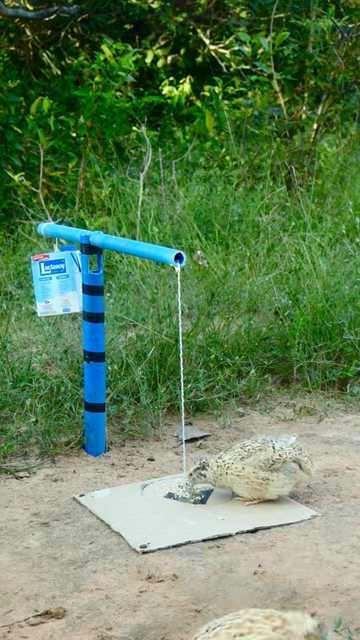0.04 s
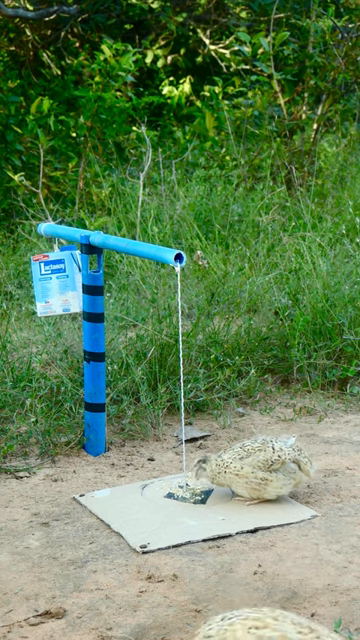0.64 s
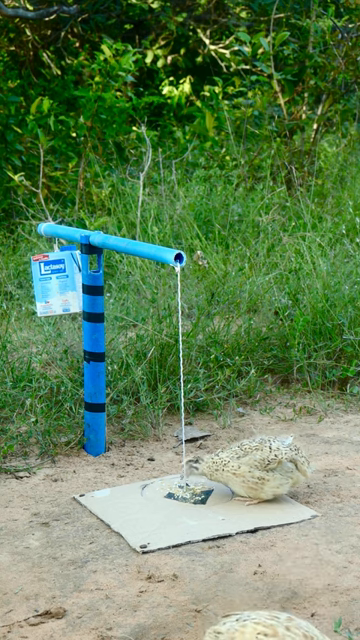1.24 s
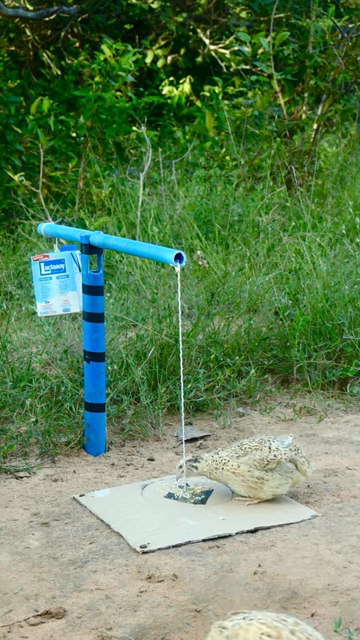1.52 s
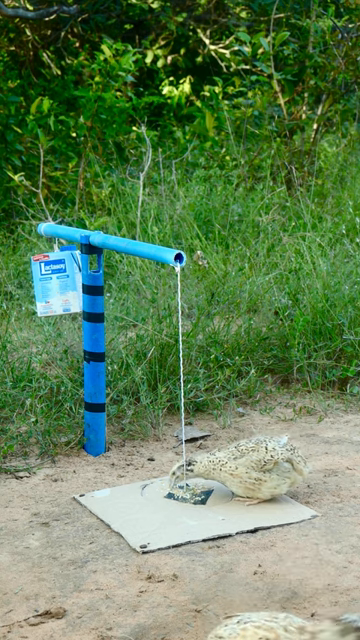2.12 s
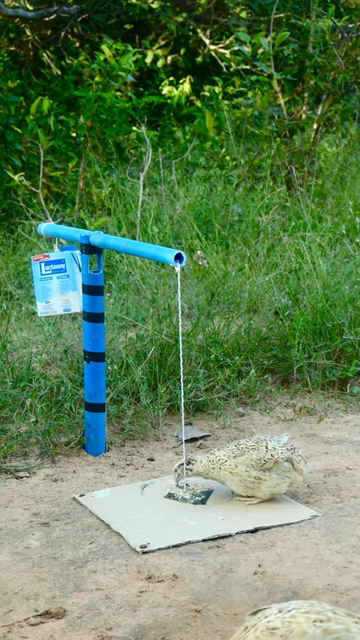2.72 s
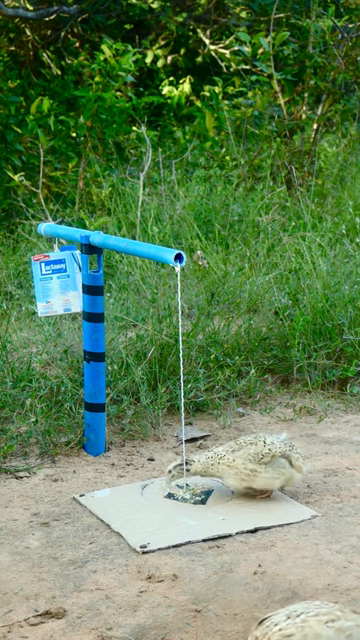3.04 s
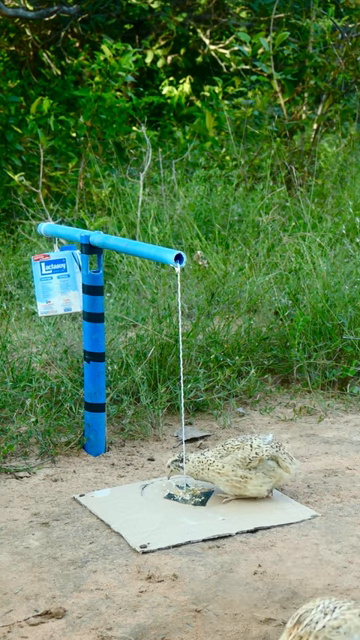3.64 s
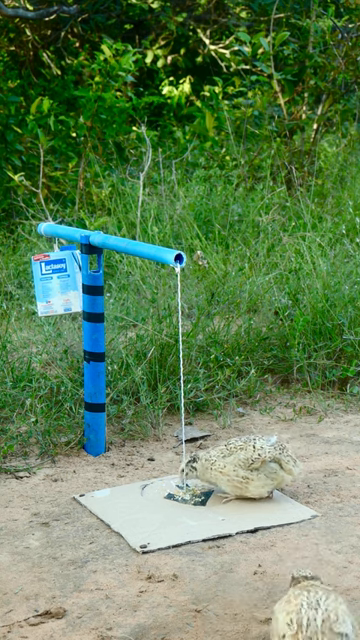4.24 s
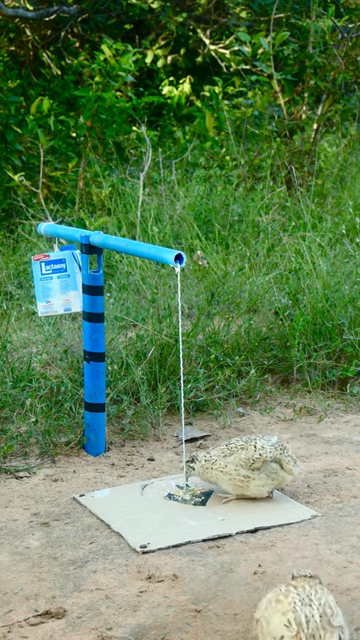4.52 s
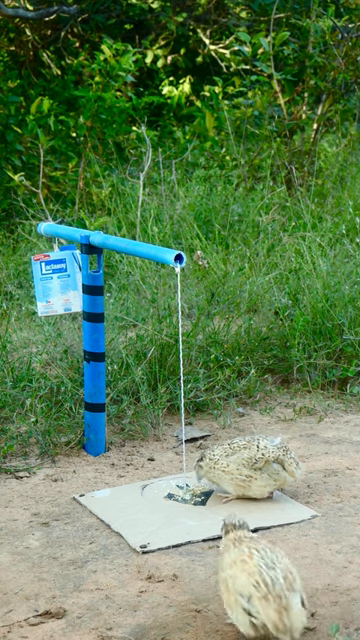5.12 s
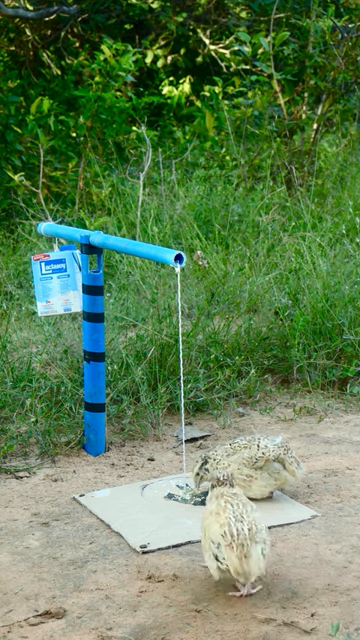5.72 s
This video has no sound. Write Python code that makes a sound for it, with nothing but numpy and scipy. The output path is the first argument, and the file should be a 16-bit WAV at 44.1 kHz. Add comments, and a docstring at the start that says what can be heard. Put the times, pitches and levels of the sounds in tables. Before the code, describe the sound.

A quail pecks seed off cardboard with dull taps and rustles, broken by one sharp snap, over faint insects and a distant engine.

```python
"""Open sandy ground, stereo microphones: air, a far engine's hum and high insects run throughout. From the
start a quail just ahead pecks seed off a sheet of cardboard, each peck a few beak contacts and a dull, falling
thump of the sheet. Its feet shuffle as it feeds; seed and sand rustle. Near 1 s the beak skids over a husk,
from 2.5 s come a few thin peeps, and at 4.3 s one sharp snap echoes off the bushes while the pecking goes on."""
import sys
import numpy as np
from scipy import signal
from scipy.fft import rfft, irfft
from scipy.io import wavfile

SR = 44100
rng = np.random.default_rng(int(sys.argv[2]) if len(sys.argv) > 2 else 0)


def generate_wav(signal):
    """Clip the signal to [-1, 1] and save it as 16-bit WAV at the path in sys.argv[1]."""
    frames = np.transpose(np.atleast_2d(signal))
    scaled = np.clip(frames, -1, 1) * 32767
    pcm = np.round(scaled).astype(np.int16)
    wavfile.write(sys.argv[1], SR, pcm)


N = 262836
TIME = np.arange(N) / SR
FREQS = np.fft.rfftfreq(N, 1 / SR)

# Pecks on the sheet, knock and tick before their trims, rebound against the first touch:
# start_s, thump_db, settled_pitch_hz, swell_s, ring_db, knock_db, tick_db, rebound_gap_s, rebound_db
PECKS = [(0.065, -32, 138.4, 0.017, -36, -53, -55.5, .007, -2),
         (0.253, -32, 138, 0.015, -37, -43.5, -62, .006, -2.5),
         (0.454, -32.5, 134, 0.0078, -42, -48.5, -55.5, .0075, 4),
         (0.665, -29.5, 135, 0.011, -41.5, -49, -47.5, 0.0045, 0),
         (0.902, -38.5, 140, 0.0058, -43.5, -46.5, -56, .004, 3.5),
         (1.147, -41, 148, 0.0066, -41.5, -43, -49, 0.0081, 1.5),
         (1.333, -35, 138, 0.012, -49, -44, -49, 0.0087, -3),
         (1.724, -33, 138, 0.01, -41, -37, -62, 0.011, -6),
         (1.960, -28.5, 134, 0.012, -43, -42, -49.5, 0.0063, -0.5),
         (2.186, -29.5, 130, 0.012, -53, -45.5, -51.5, .008, -0.5),
         (2.348, -30.5, 122.5, 0.0075, -44, -42.5, -48, 0.0063, -9),
         (2.581, -31.5, 132, 0.0089, -39.5, -41.5, -46, .005, -8.5),
         (2.763, -26.5, 128, 0.0098, -36, -44, -48.5, 0.0064, -1),
         (3.077, -28, 138.6, 0.01, -33, -43.5, -56, 0.0062, 4.5),
         (3.143, -35.5, 140.4, 0.013, -35.5, -65, -49.5, 0.0031, -2.5),
         (3.315, -30, 130, 0.01, -36, -47.5, -51.5, 0.0044, -3),
         (3.503, -41.5, 140.5, 0.011, -40.5, -47.5, -47.5, 0.007, -1),
         (3.879, -28.5, 126, 0.011, -45, -50, -54, 0.0055, 2.5),
         (4.099, -30.5, 124.6, .0135, -28.5, -46.5, -49.5, .014, -2),
         (4.444, -25, 129, 0.0087, -40, -42.5, -45.5, 0.0038, -6.5),
         (4.672, -36.5, 133, 0.0078, -40.5, -41, -51, .008, -8),
         (4.884, -33.5, 126.4, 0.0086, -39, -41, -47.5, .006, -3),
         (4.955, -35.5, 118, 0.0048, -44.5, -54, -56, .005, -6),
         (5.113, -34, 121, 0.0093, -36.5, -48.5, -54.5, 0.0089, -2.5),
         (5.528, -38.5, 124, .013, -39, -45.5, -46, .006, -14),
         (5.697, -39.5, 120, 0.011, -39.5, -52, -57, .006, -16),
         (5.773, -34.5, 123, 0.013, -42, -48.5, -53.5, .007, 1),
         (5.926, -34.5, 142, .011, -37, -49, -49, .005, -18)]
# Colour of a beak on dry seed: frequency_hz, relative_db
TICK_COLOUR = [(600, -17), (2000, -9), (3000, 1.5), (4200, -2.5), (5400, 5), (6600, 7.5), (8400, -1.5),
               (10000, 1.5), (12500, -4.5), (15500, -23)]


def amp(db):
    """Decibels to gain."""
    return 10 ** (np.asarray(db) / 20)


def unit(x):
    """Scales to rms 1."""
    return x / np.sqrt(np.mean(x ** 2) + 1e-20)


def read(points, hz):
    """Reads a spectrum on a log-frequency axis."""
    f, value = np.transpose(points)
    return np.interp(np.log(hz + 1), np.log(f + 1), value)


def add(mix, start_s, sound):
    """Lays a sound into the mix."""
    part = mix[max(round(start_s * SR), 0):][:len(sound)]
    part += sound[:len(part)]


def impulse(points, size=1024):
    """The shortest causal click that has a given spectrum, with energy 1."""
    log_gain = np.log(amp(read(points, abs(np.fft.fftfreq(size, 1 / SR)))))
    minimum_phase = np.exp(np.conj(signal.hilbert(log_gain)))
    click = np.fft.ifft(minimum_phase).real[:size // 2]
    return click / np.linalg.norm(click)


def colour(x, points):
    """Passes sound through a causal filter of the given spectrum."""
    return signal.oaconvolve(x, impulse(points))[:len(x)]


def wander(rate_hz):
    """Random drift of rms 1, mostly slower than rate_hz."""
    spectrum = rfft(rng.standard_normal(N)) / (1 + (FREQS / rate_hz) ** 4)
    return unit(irfft(spectrum * (FREQS > 0), N))


def stereo_noise(gain):
    """Noise of a given spectrum, partly alike at the two microphones."""
    # Likeness of left and right: frequency_hz, correlation
    likeness = [(25, 0.5), (70, 0.7), (130, 0.66), (260, 0.01), (1200, 0.3), (3000, 0.28), (7700, 0.92),
                (10000, 0.5), (14000, 0.2)]
    mid, side = rfft(rng.standard_normal((2, N)))
    same = read(likeness, FREQS)
    side *= np.sqrt((1 - same) / (1 + same))
    return irfft(np.array([mid + side, mid - side]) * gain, N) / np.std(irfft(mid * gain, N))


def band(hz, width_hz, db):
    """A narrow hump of stereo noise."""
    return amp(db) * stereo_noise(1 / (1 + ((FREQS - hz) / width_hz) ** 2))


def open_air(level_db=-57.5):
    """The low, steady rush of open air around the microphones."""
    # Colour of the air: frequency_hz, relative_db
    air_colour = [(20, -19), (35, -28), (55, -12.5), (75, -2), (120, 0.5), (190, -5), (270, -7.5),
                  (450, -18), (1400, -16.5), (2000, -23), (4200, -31), (5600, -24.5), (10000, -27.5),
                  (15500, -38)]
    return amp(level_db) * stereo_noise(amp(read(air_colour, FREQS)))


def far_engine(firing_hz=93.7, waver=0.015, flutter_db=2.0):
    """A distant engine's firing note, wavering on its way through the air, under steady noise bands."""
    # Upper bands of the engine: centre_hz, half_width_hz, level_db
    upper_bands = [(590.4, 24, -71), (870, 68, -77), (1128, 5, -77.5), (1284, 55, -70.5)]
    # Swell and fade of the firing note: time_s, level_db
    swells = [(0, -59), (.35, -55.5), (1.15, -55), (1.55, -58.5), (2.4, -62.5), (2.95, -58), (3.7, -61.5),
              (4.4, -57.5), (4.85, -57), (5.3, -61.5), (5.95, -57)]
    whirr = sum(band(*row) for row in upper_bands)
    turns = np.cumsum(firing_hz * (1 + waver * wander(rate_hz=8.8))) / SR
    level_db = np.interp(TIME, *np.transpose(swells)) + flutter_db * wander(rate_hz=4.5)
    return whirr + amp(level_db) * unit(np.sin(2 * np.pi * turns))


def insects(throb_db=0.55, chirps_per_s=7.42, first_chirp_s=.078, chirp_s=0.049):
    """A shimmering chorus, with one insect nearer the microphones chirping in steady time."""
    # Bands of the chorus: centre_hz, half_width_hz, level_db
    chorus_bands = [(7500, 560, -67.5), (7820, 180, -68.5)]
    chorus = sum(band(*row) * amp(throb_db * wander(rate_hz=4.7)) for row in chorus_bands)
    beats = (TIME - first_chirp_s) * chirps_per_s
    from_crest_s = ((beats + .5) % 1 - .5) / chirps_per_s
    chirps = np.exp(-(2 * from_crest_s / chirp_s) ** 4) * amp(throb_db * wander(rate_hz=4.1))
    return chorus + chirps * band(hz=7790, width_hz=320, db=-65.5)


def touches(rebound_crisp_db=5.5, last_touch_db=-5.5, fade_db=-3):
    """The beak strikes, rebounds and touches again, amid stray taps. Gives start_s, knock_db, tick_db."""
    # Stray light taps between pecks, seed clicks and a couple of soft footfalls, before the trims:
    # start_s, knock_db, tick_db
    stray_taps = [(0.707, -61, -50), (0.769, -67, -56), (1.018, -59, -71), (1.028, -51, -63),
                  (1.758, -53, -57), (1.797, -51, -57), (2.006, -52, -55), (3.224, -59, -70),
                  (3.233, -66, -48.5), (3.269, -56, -53), (3.761, -51.5, -67), (4.509, -58, -60),
                  (4.801, -53.5, -58), (5.188, -58, -58), (5.207, -51.5, -58)]
    contacts = []
    for start_s, *_, knock_db, tick_db, gap_s, rebound_db in PECKS:
        last_gap_s = rng.uniform(.0036, .003696)
        last_db = min(rebound_db, 0) + last_touch_db
        crisp_db = rebound_db + rebound_crisp_db  # the rebound lands on seed
        contacts += [(start_s, knock_db, tick_db),
                     (start_s + gap_s, knock_db + rebound_db, tick_db + crisp_db),
                     (start_s + gap_s + last_gap_s, knock_db + last_db, tick_db + last_db)]
    for start_s, knock_db, tick_db in stray_taps:
        gap_s = rng.uniform(.001575, .00336)
        for k in range(3):  # each tap is three quick, fading contacts
            contacts.append((start_s + k * gap_s, knock_db + 2 * k * fade_db, tick_db + k * fade_db))
    return contacts


def sheet_blow(modes, spread, detune):
    """One blow on the sheet; the mix and tuning of its modes vary at random, as with where it lands."""
    t = TIME[:SR // 5]
    hz, db, t60 = np.transpose(modes)[:, :, None]
    weight, shift, lag = rng.standard_normal((3, len(modes), 1))
    waves = np.sin(2 * np.pi * hz * (1 + detune * shift) * t + np.pi * lag)
    return ((1 + spread * weight) * amp(db - 60 * t / t60) * waves).sum(0)


def sheet_thumps(start_pitch_ratio=2.3, settle_s=0.005):
    """Short bending waves outrun long ones, so each thump falls in pitch; the sheet then rings on."""
    # Low modes of the sheet: pitch_hz, relative_db, t60_s
    low_modes = [(141.5, 5.5, 0.13), (184.3, -4, 0.18), (253, 13, 0.059)]
    out, t = np.zeros(N), TIME[:SR // 5]
    glide = t + (start_pitch_ratio - 1) * settle_s * (1 - np.exp(-t / settle_s))
    for start_s, thump_db, hz, swell_s, ring_db, *_ in PECKS:
        swell = (t / swell_s * np.exp(1 - t / swell_s)) ** 2.36
        push = swell * np.sin(2 * np.pi * hz * glide)
        ring_onset = 1 - np.exp(-(t / swell_s / 2) ** 2)
        ring = ring_onset * sheet_blow(low_modes, spread=0.64, detune=0.057)
        add(out, start_s, amp(thump_db) * push + amp(ring_db) * ring)
    return out


def card_knocks(contacts, trim_db=-2):
    """Each contact rings the cardboard's upper modes."""
    # Upper modes of the sheet: pitch_hz, relative_db, t60_s
    upper_modes = [(585, -3, .038), (665, -7, .03), (830, -8, .025), (1010, -3, .032), (1125, -4, .03),
                   (1380, -5, .026), (1740, -2.5, .026), (2300, -8, .014), (2980, -8, .018)]
    out = np.zeros(N)
    for start_s, db, _ in contacts:
        knock = sheet_blow(upper_modes, spread=0.063, detune=0.016)
        attack_rms = np.std(knock[:SR // 600])
        add(out, start_s, amp(db + trim_db) * knock / attack_rms)
    return out


def ticks(contacts, trim_db=-1, crack_s=0.0015, crunch_db=-15, crunch_s=0.017):
    """Each contact, mostly hard beak on dry seed, gives an instant crack and a short gritty crunch."""
    out, t = np.zeros(N), TIME[:SR // 20]
    for start_s, _, db in contacts:
        crack, grit, size = rng.standard_normal((3, len(t)))
        crunch = amp(crunch_db) * grit * size * np.exp(-t / crunch_s)
        tick = crack * np.exp(-t / crack_s) + crunch
        attack_rms = np.std(tick[:SR // 600])
        add(out, start_s, amp(db + trim_db) * tick / attack_rms)
    return colour(out, TICK_COLOUR)


def grains(per_s, spread_db, clump_db):
    """Tiny collisions of uneven size that come in clumps."""
    size = amp(spread_db * np.minimum(rng.exponential(1, N), 4)) * rng.standard_normal(N)
    hits = rng.random(N) < per_s / SR
    return unit(size * hits * amp(clump_db * wander(rate_hz=66)))


def seed_ring(resonances):
    """The damped resonances of a seed or husk, with energy 1."""
    t = TIME[:SR // 50]
    ring = sum((-1) ** k * amp(db) * width * np.exp(-np.pi * width * t) * np.sin(2 * np.pi * hz * t)
               for k, (hz, width, db) in enumerate(resonances))
    return ring / np.linalg.norm(ring)


def scuffs(coarse_trim_db=-4, fine_trim_db=-2, seed_width_hz=550):
    """Feet and beak drag coarse seed and fine sand, and each peck stirs a little: scrape and hiss."""
    # Strokes over the ground, before the trims:
    # crest_s, rise_s, fall_s, coarse_db, fine_db, seed_pitch_hz
    drags = [(0.275, 0.048, 0.13, -56, -52.5, 1550), (0.516, 0.037, 0.028, -54, -51, 2260),
             (0.709, 0.09, .15, -73, -55.5, 1660), (0.822, 0.031, 0.12, -54, -52.5, 2630),
             (1.021, 0.08, 0.044, -55, -57, 1670), (1.21, 0.056, 0.22, -64, -56.5, 2940),
             (1.776, 0.11, .12, -57.5, -49.5, 2760), (1.834, 0.024, .07, -51.5, -70, 1580),
             (2.132, 0.095, 0.092, -59, -57.5, 1750), (2.648, 0.071, 0.064, -60.5, -58.5, 3840),
             (3.108, 0.022, 0.026, -54, -53.5, 2300), (3.713, 0.049, 0.049, -60.5, -56, 3130),
             (4.134, 0.052, 0.098, -58, -57, 2960), (4.765, 0.086, 0.02, -56, -49.5, 3220),
             (5.221, 0.022, 0.05, -49.5, -53, 3000), (5.45, 0.037, 0.085, -63.5, -62, 3000),
             (5.815, 0.066, 0.059, -58, -55, 3330), (5.86, 0.032, 0.13, -58.5, -60, 2170)]
    t = TIME[::SR // 1000]

    def stroke(crest_s, rise_s, fall_s):
        """Rises to a crest and dies away."""
        return np.exp(np.minimum((t - crest_s) / rise_s, (crest_s - t) / fall_s))

    stirs = [stroke(start_s + 0.019, rise_s=0.038, fall_s=0.037) for start_s, *_ in PECKS]
    strokes = [(stroke(*row[:3]), *row[3:]) for row in drags]
    strokes.append((np.linalg.norm(stirs, axis=0), -64, -61.5, 1650))
    rattle = grains(per_s=1400, spread_db=1.5, clump_db=1.5)
    coarse_power, fine_power, seeds = np.zeros((3, N))
    for swell, coarse_db, fine_db, seed_hz in strokes:
        swell = np.interp(TIME, t, swell)
        coarse_power += (amp(coarse_db) * swell) ** 2
        fine_power += (amp(fine_db) * swell) ** 2
        ring = seed_ring([(seed_hz, seed_width_hz, 0)])
        seeds += signal.oaconvolve(amp(coarse_db) * swell * rattle, ring)[:N]
    # Colours of the seed's scrape and the sand's hiss: frequency_hz, relative_db
    scrape_colour = [(200, 10), (700, -7), (1700, 5), (2400, 4), (3100, -0.5), (4200, 2.5), (6000, -4.5),
                     (10000, -49)]
    hiss_colour = [(2500, -28.5), (4300, -9.5), (5500, 1), (6700, -1), (8500, -3), (10000, -1.5),
                   (12000, -8.5), (13500, -19), (15500, -27)]
    scrape = colour(np.sqrt(coarse_power) * grains(per_s=4000, spread_db=1, clump_db=4), scrape_colour)
    hiss = colour(np.sqrt(fine_power) * grains(per_s=8000, spread_db=-1.5, clump_db=2), hiss_colour)
    return amp(coarse_trim_db) * (scrape + seeds), amp(fine_trim_db) * hiss


def beak_skid(start_s=.9475, length_s=.012, level_db=-45, slips_per_s=1400, jitter=0.38):
    """The beak skids over a husk, ringing it with a quick run of uneven slips."""
    # Resonances of the husk: pitch_hz, width_hz, relative_db
    husk = [(2070, 260, 8), (5890, 170, 6.5), (9800, 720, 1.5), (11000, 600, 0), (14200, 580, 5)]
    out, length = np.zeros(N), round(length_s * SR)
    turns = np.cumsum(slips_per_s * (1 + jitter * wander(rate_hz=360)[:length])) / SR
    slips = np.diff(np.floor(turns), prepend=-1)
    skid = colour(signal.fftconvolve(slips, seed_ring(husk)), TICK_COLOUR)
    add(out, start_s, amp(level_db) * skid / np.std(skid[:length]))
    return out


def peeps():
    """Faint whistles, each an arch or a slide in pitch, made raspy by a fast flutter."""
    # Thin calls: start_s, length_s, start_hz, middle_hz, end_hz, peak_db, rasp_share_of_pitch
    calls = [(2.508, .078, 4330, 4690, 4100, -56.5, .005), (2.585, .032, 4000, 3850, 3720, -64, .01),
             (2.64, .05, 3750, 3950, 3900, -63, .012), (3.685, .05, 3350, 3300, 3200, -60, .07),
             (5.443, .033, 3100, 3180, 3400, -61, .02), (5.608, .036, 3750, 3300, 3080, -59, .025),
             (5.665, .025, 4700, 4820, 4780, -64, .02)]
    out = np.zeros(N)
    for start_s, length_s, *pitches_hz, peak_db, rasp in calls:
        progress = np.linspace(0, 1, round(length_s * SR))
        contour_hz = np.polyval(np.polyfit([0, .5, 1], pitches_hz, 2), progress)
        hz = contour_hz * (1 + rasp * wander(rate_hz=170)[:len(progress)])
        swell = amp(peak_db) * np.sin(np.pi * progress ** 0.89)
        add(out, start_s, swell * np.sin(2 * np.pi * np.cumsum(hz) / SR))
    return out


def snap(start_s=4.2577, crack_db=-5.7, ring_db=-31, ring_s=0.0022, echo_delay_s=.006):
    """One sharp dry snap a little to the right: a crack, a brief ring, echoes off ground and bushes."""
    # Colours of the snap and of its echo: frequency_hz, relative_db
    snap_colour = [(150, -22), (450, -12), (900, -2.5), (1900, -1), (3100, 1), (3800, -1), (4200, -10),
                   (4700, -3), (6100, -3), (8000, -10), (9900, -10), (11300, -16), (13500, -31),
                   (16000, -40)]
    echo_colour = [(200, -17), (700, -17), (1300, 1), (2000, 2.5), (3000, 9.5), (4500, 2), (6400, -3),
                   (9000, -11), (15000, -32)]
    out, t = np.zeros((2, N)), TIME[:SR // 2]
    near_ground = amp(-42) * np.exp(-t / .021)
    far_bushes = amp(-60) * np.exp(-t / .17)
    pole = .62  # all-pass: the lows lag slightly
    crack = signal.lfilter([pole ** 2, -2 * pole, 1], [1, -2 * pole, pole ** 2], impulse(snap_colour))
    for microphone, side_db in zip(out, (-.5, .5)):
        ring, echo = rng.standard_normal((2, len(t)))
        add(microphone, start_s, amp(crack_db + side_db) * crack)
        add(microphone, start_s, amp(ring_db) * colour(ring * np.exp(-t / ring_s), snap_colour))
        add(microphone, start_s + echo_delay_s, colour(echo * (near_ground + far_bushes), echo_colour))
    return out


def ground_scatter(x, t60_s=0.057):
    """Faint reflections off ground and grass, different at each microphone."""
    t = TIME[:SR // 4]
    tail = rng.standard_normal((2, len(t))) * amp(-60 * t / t60_s)
    return signal.fftconvolve(x[None], tail / np.linalg.norm(tail[0]), axes=1)[:, :N]


def scene(pan_db=1.96):
    """The birds just ahead of the microphones and slightly right, in the open."""
    contacts = touches()
    thump, knock, peep = sheet_thumps(), card_knocks(contacts), peeps()
    scrape, hiss = scuffs()
    crisp = ticks(contacts) + beak_skid()
    direct = thump + crisp + hiss + peep + (knock + scrape) * amp([[-pan_db], [pan_db]])
    peck_send = amp(-13) * (knock + crisp) + amp(-23) * thump
    rustle_send = amp(-4) * scrape + amp(-10) * hiss
    reflections = ground_scatter(peck_send + rustle_send + amp(-3) * peep)
    return direct + reflections + snap() + open_air() + far_engine() + insects()


def record(dry, edge_hz=15750):
    """The recorder's band limit."""
    low_pass = signal.firwin(511, edge_hz, window=("kaiser", 9), fs=SR)
    return signal.oaconvolve(dry, low_pass[None], "same")


dry = scene()
out = record(dry)
generate_wav(out)
```